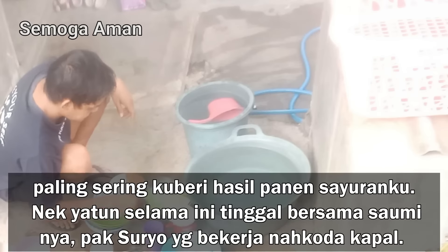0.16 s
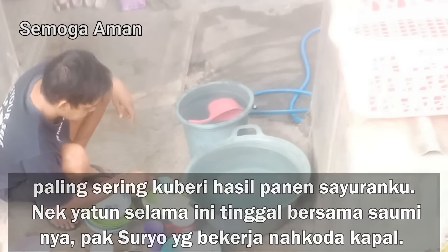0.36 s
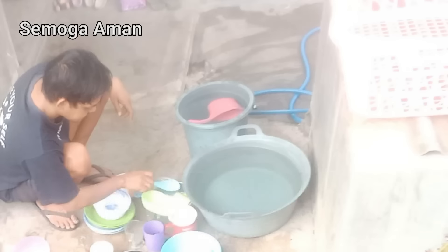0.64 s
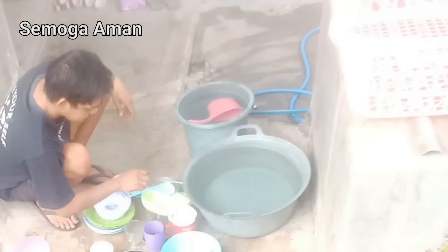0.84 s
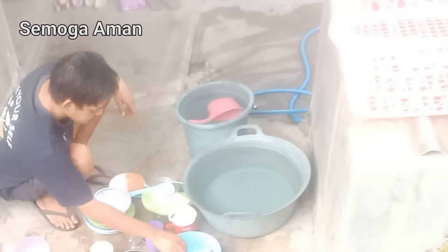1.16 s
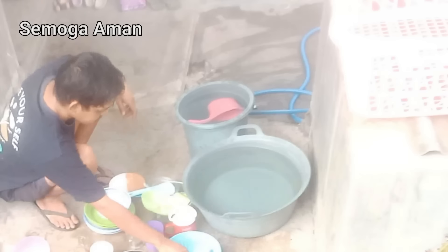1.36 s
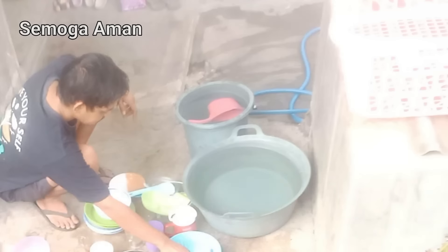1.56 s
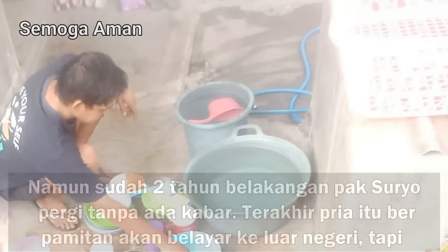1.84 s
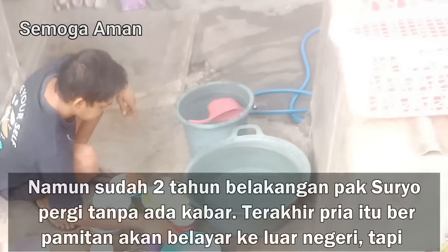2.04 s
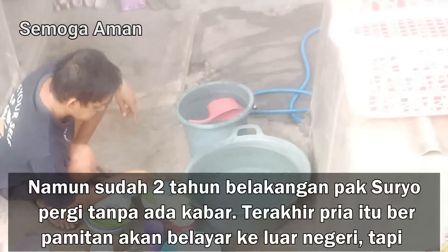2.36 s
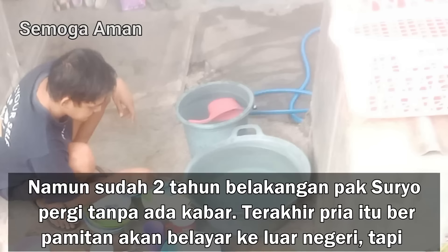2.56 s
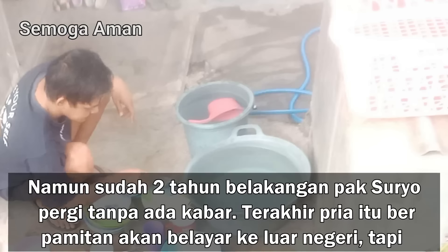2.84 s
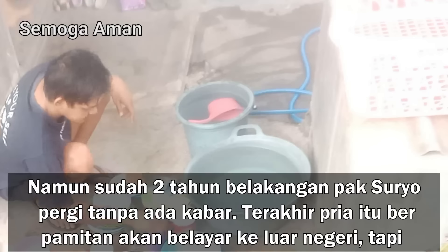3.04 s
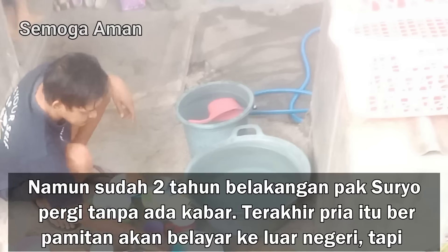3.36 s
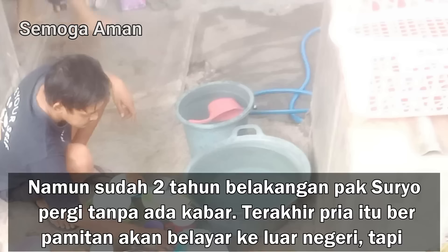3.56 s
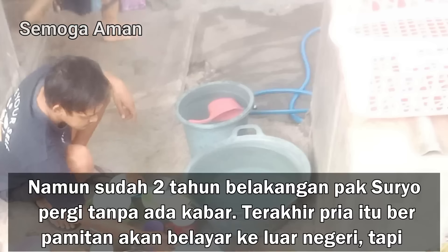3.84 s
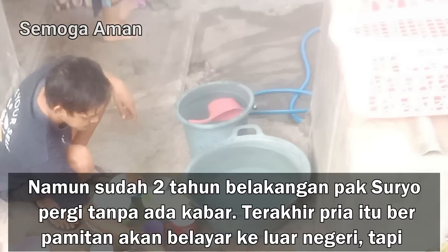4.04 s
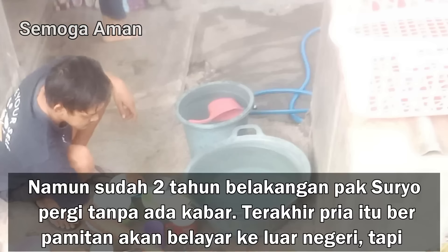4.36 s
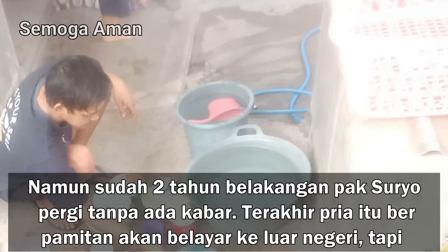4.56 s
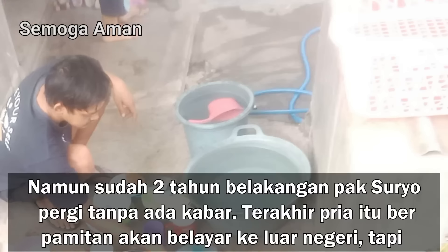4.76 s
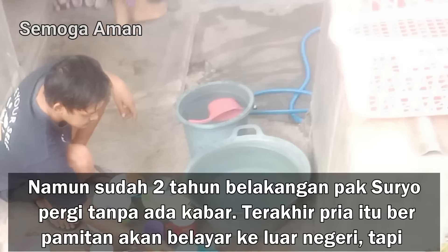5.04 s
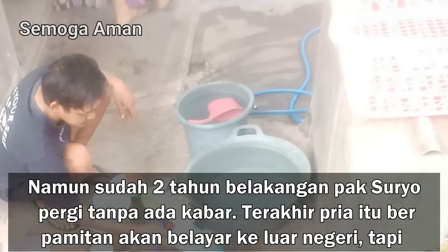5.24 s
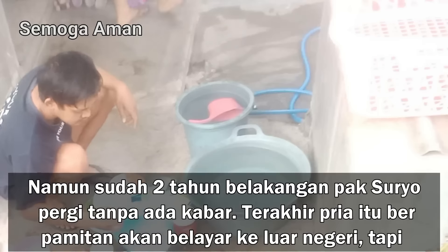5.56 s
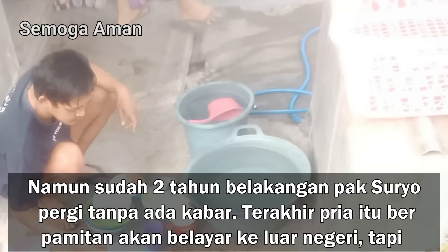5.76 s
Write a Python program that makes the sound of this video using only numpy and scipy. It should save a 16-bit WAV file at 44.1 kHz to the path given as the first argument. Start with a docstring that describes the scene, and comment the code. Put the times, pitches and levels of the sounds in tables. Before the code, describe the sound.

Someone handles wet dishes close by, sparse knocks growing into loud clacks near the end, while chicks peep faintly further off.

```python
"""Dishes handled in a walled yard

Plastic and metal dishes are knocked, set down and slid about on a concrete floor.
Each blow is a noise crack and rattle that ring the struck dish's modes; slid dishes hum as wavering tones.
Wet hands swish as shaped noise, chicks peep further off as rising whistles, and a narrow-band rumble
swells over the air of the yard. Decaying noise tails give the echoes of the walls."""
import sys
import numpy as np
from scipy import signal
from scipy.fft import rfft, irfft
from scipy.io import wavfile
from scipy.ndimage import uniform_filter1d

SR = 44100
rng = np.random.default_rng(int(sys.argv[2]) if len(sys.argv) > 2 else 0)


def put_to_file(sound):
    """Save the sound as 16-bit audio at rate SR, in the file named by the first command-line argument."""
    columns = np.atleast_2d(sound).T  # one column per channel
    safe = np.clip(columns, -1, 1)
    whole_steps = np.round(safe * 32767)
    wavfile.write(sys.argv[1], SR, whole_steps.astype(np.int16))


N = 260631

# low modes of the basin, part of the dish table: hz, width_hz, level_db (relative)
BASIN_WALLS = [(247, 10, -7), (336, 11, -17), (358, 22, -2), (413.4, 42, 4), (502, 5.5, -3.5)]


def undb(db):
    """Amplitude ratio of a level in dB."""
    return 10 ** (np.asarray(db) / 20)


def unit(x):
    """Scale to rms 1."""
    return x / np.sqrt(np.mean(x ** 2))


def on_log(hz, points):
    """Interpolate (hz, value) points over log frequency."""
    points_hz, values = np.transpose(points)
    return np.interp(np.log(hz + 1), np.log(points_hz), values)


def coloured(points, tilt_db_per_octave=0.):
    """Noise with a given spectrum, rms 1."""
    hz = np.fft.rfftfreq(N, 1 / SR)
    gain_db = on_log(hz, points) + tilt_db_per_octave * np.log2((hz + 50) / 6000)
    white = rng.standard_normal(N)
    return unit(irfft(rfft(white) * undb(gain_db), N))


def band(x, hz, width_hz):
    """Two-pole resonance, gain 1 at the centre."""
    b, a = signal.iirpeak(min(hz, .45 * SR), hz / max(width_hz, 3), SR)
    return signal.lfilter(b, a, x)


def smooth_twice(x, size):
    """Moving average, applied twice."""
    return uniform_filter1d(uniform_filter1d(x, size), size)


def walk(rate_hz):
    """Random levels held 1 / rate_hz s and slewed twice, rms 1."""
    hold = int(SR / rate_hz)
    steps = np.repeat(rng.standard_normal(N // hold + 1), hold)
    return unit(smooth_twice(steps, hold)[:N])


def add(out, start_s, x):
    """Mix x into out from start_s, cut at the end of out."""
    i = int(start_s * SR)
    out[i:i + len(x)] += x[:N - i]


def causal(size, gain_db):
    """Minimum-phase spectrum with this gain: the filter answers only after its input."""
    cepstrum = irfft(gain_db * np.log(10) / 20, size)
    cepstrum[1:size // 2] *= 2
    cepstrum[size // 2 + 1:] = 0
    return np.exp(rfft(cepstrum))


def air():
    """Steady coloured noise whose octave bands flicker independently."""
    # air spectrum: hz, density_db_per_hz (relative)
    air_colour = [(15, -57), (25, -38), (97, -1.5), (242, -6), (285, -6), (405, -13), (516, -9.5),
                  (575, -12), (1040, -15.5), (2220, -22), (2610, -23.5), (6210, -29.5), (7920, -26),
                  (10100, -45.5), (16000, -47)]
    level_db, flicker_db, flicker_hz = -59.5, 1.3, 3.39
    hush = coloured(air_colour)
    bands = 0
    for hz in 40 * 2. ** np.arange(9):
        bands = bands + undb(flicker_db * walk(flicker_hz)) * band(hush, hz, 1.4 * hz)
    return undb(level_db) * unit(bands)


def rumble():
    """A narrow low rumble: faint between swells that grow a little and then stop short."""
    # swells: start_s, length_s, level_db (nominal, at the end of the growth)
    swells = [(0.202, 0.41, -51.5), (0.888, .14, -46), (1.487, 0.11, -64), (1.807, 0.066, -51),
              (2.344, 0.15, -53), (2.913, 0.19, -49), (3.095, 0.14, -51), (3.37, 0.23, -59),
              (4.506, .1, -49.5), (5.12, 0.28, -51.5), (5.72, 0.12, -56)]
    centre_hz, width_hz = 72, 30
    edge_s, growth_db, lull_db = 0.051, 3.5, -74
    t = np.arange(N) / SR
    gain = undb(lull_db + 1.7 * walk(5.8))
    for start_s, length_s, level_db in swells:
        edges = np.clip(np.minimum(t - start_s, start_s + length_s - t) / edge_s, 0, 1)
        growth = np.clip((t - start_s) / length_s - 1, -1, 0)
        gain = gain + edges * undb(level_db + growth_db * growth)
    white = rng.standard_normal(N)
    return gain * unit(band(band(white, centre_hz, width_hz), centre_hz, width_hz))


def grazes(count):
    """Faint hums at chance moments and pitches, as hands shift the pile."""
    level_db, spread_db = -67, 1.5
    shortest_s, longest_s = .03, .09
    lowest_hz, highest_hz = 299.8, 3003
    rows = []
    for when, how_long, how_high, how_loud in rng.random((count, 4)):
        start_s = when * (N / SR - .2)
        length_s = shortest_s + (longest_s - shortest_s) * how_long
        hz = lowest_hz * (highest_hz / lowest_hz) ** how_high
        rows.append((start_s, length_s, hz, level_db + spread_db * (2 * how_loud - 1)))
    return rows


def swish():
    """Wet hands wipe over plastic and water slops: a grainy hiss that swells, then dies away."""
    # wipes: start_s, rise_s, fall_s, level_db, tilt_db_per_octave
    wipes = [(.45, 0.23, 0.078, -61, 4.5), (.69, 0.018, 0.2, -50, 0.3), (1.74, 0.09, 0.1, -57, 3),
             (4.2, .01, 0.13, -36, -6), (4.37, 0.01, 0.04, -61, 5.7), (4.92, .012, .06, -58.5, 3),
             (5.855, .025, 0.069, -45.5, 3)]
    # hiss spectrum: hz, density_db_per_hz (relative)
    hiss_colour = [(880, -45.5), (1500, -8.5), (1960, -21.5), (2310, -8), (3210, -17), (4210, -6.5),
                   (4910, -19.5), (7570, -4), (15000, -45)]
    fall_db, grain_db, grain_hz = 16, 2.2, 120  # fall_db is lost over each fall_s
    t, out = np.arange(N) / SR, 0
    for start_s, rise_s, fall_s, level_db, tilt in wipes:
        late = np.clip((t - start_s - rise_s) / fall_s, 0, None)
        shape = np.clip((t - start_s) / rise_s, 0, 1) * undb(level_db - fall_db * late)
        out = out + shape * coloured(hiss_colour, tilt)
    return out * undb(grain_db * walk(grain_hz))


def hums():
    """Friction, or a brief knock, feeds a mode unevenly, so the tone wavers in level and pitch, and sags as the
    slide slows."""
    # one mode of a slid or grazed dish, or a short ping of a struck one: start_s, length_s, first_pitch_hz,
    # level_db (nominal)
    slides = [(.47, 0.043, 536, -58.5), (.52, 0.12, 712, -54.5), (1.3, .05, 4980, -51),
              (1.318, 0.051, 8210, -50.5), (1.378, 0.15, 4550, -55), (1.75, 0.061, 912, -52),
              (1.757, .16, 1245, -42), (1.9, .11, 1176, -50.5), (1.93, 0.074, 900, -57.5),
              (1.93, 0.047, 3196, -61), (2.015, 0.049, 1157, -50.5), (2.106, .085, 1215, -43.5),
              (2.235, .055, 1030, -54), (2.35, 0.1, 632.6, -49.5), (2.385, 0.13, 845, -51),
              (2.53, .1, 601, -61), (2.67, 0.046, 626, -53.5), (2.69, .14, 835, -58),
              (2.72, 0.056, 1260, -56), (2.71, 0.057, 2660, -59.5), (2.74, 0.07, 3240, -57),
              (2.76, 0.053, 2285, -57.5), (2.901, 0.033, 2371, -35), (3.387, .08, 632, -59.5),
              (3.614, .09, 1136, -64), (4.119, .06, 622, -56.5), (5.04, 0.28, 1197, -44),
              (5.349, .07, 1201, -40.5), (5.42, .1, 1165, -50.5), (5.53, 0.064, 588, -56.5),
              (5.74, .07, 510, -58)]
    sag_per_s, waver_share, rough_width_share = 0.28, 0.0119, 0.03  # shares of the pitch
    attack_s, fade_db, stutter_db = .008, 12.5, 1.5
    out, waver = np.zeros(N), walk(40)
    stutter = undb(stutter_db * walk(30))
    for start_s, length_s, hz, level_db in slides + grazes(count=90):
        t = np.arange(int(length_s * SR)) / SR
        wobble = waver[int(start_s * SR):][:len(t)]
        pitch_hz = hz * (1 - sag_per_s * t + waver_share * wobble)
        # drawn long, so that the resonance has built up in the part kept
        rough = unit(band(rng.standard_normal(SR // 3), hz, rough_width_share * hz))[-len(t):]
        tone = np.sin(2 * np.pi * np.cumsum(pitch_hz) / SR) + 0.57 * rough
        edges = np.minimum(np.minimum(t, length_s - t) / attack_s, 1)
        shape = edges * undb(-fade_db * (t / length_s) ** 3)
        add(out, start_s, undb(level_db) * band(shape * tone, hz, hz / 2))
    return out * stutter


def ringing(force, modes, tilt_db_per_octave):
    """Each mode resonates to the blow and takes its own share of the energy."""
    total = 0
    for hz, width_hz, level_db in modes:
        ring = unit(band(band(force, hz, width_hz), hz, hz / 4))
        gain_db = level_db + tilt_db_per_octave * np.log2(hz / 2000)
        total = total + undb(gain_db) * np.sqrt(width_hz) * ring
    return unit(total)


def blows():
    """A bright crack, then the dish chatters against its neighbours until it settles; both shake its modes."""
    # blows: start_s, dish, level_db (over the rms of crack + rattle), rise_ms, crack_db (over the rattle),
    # rattle_t60_s, ring_db (over the body), tilt_db_per_octave
    strikes = [ (0.873, "bowl", -26.5, 1.1, 4.5, 0.21, -3, -0.4),
               (.952, "bowl", -38.5, 1.1, 25.5, 0.13, -22, -4), (1.32, "lid", -40.5, 6, -9, 0.4, -3, -5),
               (1.692, "mug", -46.5, 1.1, 18, 0.11, 1.5, -2), (1.812, "mug", -57, 1.5, -10, 0.12, 7.5, -4),
               (2.903, "cup", -48, 1.1, 3, 0.33, 4, -1), (2.934, "spoon", -46, 4.4, 0.5, 0.28, -9.5, -2.5),
               (2.9852, "spoon", -32, 2.5, 4, .18, -9, 1.5), (3.115, "steel", -56, 8, 5, 0.44, 2.5, -6),
               (3.158, "steel", -29, 29, 9, 0.21, 0.5, -3.5), (3.180, "steel", -32, 1.5, -48.5, 0.28, 6, 3),
               (3.845, "mug", -64.5, 3, -1, 0.17, 1.5, -3), (4.05, "mug", -52.5, 1.5, 11.5, 0.12, 3.5, -6),
               (4.191, "basin", -21, .6, 16.5, .2, -6.5, -0.32),
               (4.381, "spoon", -56.5, 1.5, 16, 0.084, -23, 10.5),
               (4.516, "plate", -24.5, .6, 19, .2, 2, -0.24),
               (4.7918, "saucer", -35, .6, 17, 0.14, -3, -2.5),
               (4.887, "saucer", -43.5, 1.5, 8, 0.19, -28, -2.6),
               (4.917, "spoon", -38, .6, 4.5, 0.081, -21, 1), (5.036, "tray", -23, .6, 14, 0.17, -9, 2),
               (5.2372, "pot", -23.5, .6, 11.5, 0.17, -3.5, -3), ]
    # per dish: modes (hz, width_hz, level_db) and rattle colour (hz, density_db_per_hz), levels relative
    dishes = { "bowl": ([(810, 30, -9), (1200, 63, -2.5), (2020, 690, -20), (2650, 39, -8.5),
              (4200, 140, -27), (5200, 98, -24), (6900, 27, -40), (6270, 110, -23), (10900, 87, -54)],
              [(120, -59), (200, -45), (635, -10), (1060, -12), (1210, -7.5), (1590, -11), (2700, -16),
              (7970, -11.5), (16000, -52)]), "lid": ([(596, 60, -11), (1428, 27, 6), (1760, 12, 10),
              (2480, 70, -27), (3180, 11, 18.5), (4170, 190, 7), (5100, 39, 0), (5340, 30, -23),
              (6460, 120, -23), (7890, 37, -5), (7840, 28, 4), (10300, 30, -31)], [(240, -58), (400, -24),
              (607, -15), (1110, -43), (1420, 2.5), (2470, 12), (7400, -23), (8110, -22), (16000, -59)]),
              "cup": ([(1270, 29, -6), (1690, 43, -6), (2360, 64, -6), (4120, 28, -9), (4490, 56, -3),
              (5580, 39, -23), (6320, 47, -3), (7200, 61, -5), (7600, 45, -10), (9400, 42, -14),
              (10500, 32, -23.5)], [(240, -55), (400, -11.5), (1230, -8.5), (2020, 0.5), (2360, 13),
              (3470, -27), (4050, -15.5), (8110, -7.5), (16000, -70)]), "mug": ([(1550, 30, -1),
              (2322, 200, -3), (2650, 30, -10), (3140, 170, -12), (4300, 66, -4), (6900, 58, -17),
              (8050, 60, -2.5), (10300, 33, -15)], [(350, -33), (600, -43), (1430, -6.5), (2090, -4.5),
              (2370, -12), (2870, -18.5), (8160, -15), (16000, -80)]), "spoon": ([(1524, 39, -6.5),
              (2320, 47, -7), (2850, 12, -2), (3350, 47, -6), (3990, 50, -5), (6150, 26, -26),
              (6530, 100, -5), (7390, 94, -13), (8900, 26, -11), (11900, 31, -11), (13200, 30, -13.5),
              (14100, 28, -23.5)], [(240, -47.5), (400, -23.5), (553, -7.5), (1490, -9.5), (1840, -13.5),
              (3310, -5), (5690, -8.5), (7280, 0), (16000, -48)]), "steel": ([(1231, 72, -16),
              (1600, 32, -16), (2040, 33, -21), (2785, 31, 3), (4060, 74, -5), (3920, 24, -13.5),
              (4585, 140, -4), (4770, 22, -5), (5300, 35, -6.5), (5530, 20, -16.5), (5970, 35, -6.5),
              (6670, 120, -1), (7150, 44, -17), (7410, 18, -13.5), (7816, 40, 3.5), (8630, 97, -23),
              (9170, 60, -4.5), (9810, 38, -9.5), (10700, 30, -10.5), (11180, 44, -41), (11480, 120, -20.5),
              (12800, 54, -17.5), (13300, 31, -50), (14100, 60, -23.5), (14600, 34, -24), (14600, 54, -19)],
              [(240, -50.5), (400, -24), (1200, -18), (1930, -9.5), (2750, -7), (3210, -9.5), (5690, -14.5),
              (6640, -0.5), (16000, -41)]), "basin": (BASIN_WALLS + [(833.0, 13, 0.5), (1325, 27, -6),
              (1880, 34, -9.5), (2190, 18, -2.5), (2920, 30, -23.5), (3430, 44, -7.5), (5100, 42, -24),
              (5470, 81, -11.5)], [(59, -65), (100, -30.5), (308, -18), (433, -4), (648, -15), (854, -10.5),
              (1580, -25), (1950, -11.5), (2520, -21.5), (7940, -33), (16000, -65)]),
              "plate": ([(710, 190, 3), (2030, 236, 5.5), (2872, 43, 3), (3970, 140, -6.5),
              (4160, 100, -22.5), (5150, 86, -29), (5360, 54, -21), (5700, 34, -12), (6360, 93, -2.5),
              (6620, 56, -8), (7600, 55, 0.5), (8030, 110, -7.5), (8170, 66, -14), (8460, 40, -25.5)],
              [(59, -41), (100, -37.5), (244, -1.5), (461, -1), (705, 0.5), (1760, 1), (2080, -12),
              (3620, -8), (7450, -16), (8830, -33), (16000, -55)]), "saucer": ([(252, 34, 1), (419, 12, -6),
              (720, 180, 0.5), (1250, 13, -16), (2050, 620, -7.5), (2720, 84, -27), (3260, 72, -3),
              (4460, 40, -22)], [(59, -60), (100, -39), (239, -6), (328, -2.5), (1250, -5), (1420, -6),
              (2080, -1.5), (8110, -15), (16000, -46)]), "tray": ([(942, 32, 9), (1320, 32, -5),
              (1657, 32, 11), (1723, 39, 9.5), (2250, 32, -13), (2300, 28, -5), (3270, 52, 4),
              (3620, 48, 1), (3930, 46, -4), (4020, 65, -1.5), (4280, 50, -34)], [(59, -69), (100, -34),
              (570, 4), (950, 0), (1480, -5.5), (1870, -6), (2750, -14.5), (3190, -19), (7450, -25),
              (16000, -72)]), "pot": ([(466, 78, -1), (724, 80, 6.5), (1180, 44, -12), (1480, 33, -22),
              (1836, 25, 11.5), (2496, 34, 9.5), (2790, 310, 4.5), (3100, 210, 2), (3780, 51, -26),
              (4350, 37, -24)], [(59, -59), (100, -69), (219, -18), (492, 0.5), (621, 0.5), (752, -2.5),
              (1870, -5), (2080, -10.5), (7940, -17.5), (16000, -56)]), }
    crack_t60_s, chatter_db, lumps_rms_db = 0.0068, 3.13, 2.5  # chatter before smoothing
    out, t = np.zeros(N), np.arange(SR // 2) / SR
    size = len(t)
    hz = np.fft.rfftfreq(size, 1 / SR)
    octaves = np.log2((hz + 50) / 2000)
    for start_s, dish, level_db, rise_ms, crack_db, rattle_t60_s, ring_db, tilt in strikes:
        modes, colour = dishes[dish]
        steps = np.repeat(rng.standard_normal(size // 128 + 1), 128)
        chatter = undb(chatter_db * uniform_filter1d(steps, size=64)[:size])
        touch = np.minimum(t * 1000 / rise_ms, 1) * rng.standard_normal(size)
        crack = touch * undb(crack_db - 60 * t / crack_t60_s)
        rattle = touch * chatter * undb(-60 * (t / rattle_t60_s) ** 1.235)
        ring = ringing(undb(1.5) * crack + rattle, modes, tilt)
        # random smooth lumps in the spectrum vary the colour of each blow
        lumps_db = lumps_rms_db * unit(smooth_twice(rng.standard_normal(len(hz)), 90))
        body_db = on_log(hz, colour) + tilt * octaves + lumps_db
        rattle_spectrum = rfft(rattle) * causal(size, body_db)
        crack_spectrum = rfft(crack) * causal(size, body_db + 1.2 * octaves)  # brighter
        body = irfft(rattle_spectrum + crack_spectrum, size)
        strength = undb(level_db) * np.std(crack + rattle)
        add(out, start_s, strength * (body / np.std(body) + undb(ring_db) * ring))
    return out


def peep(length_s, first_hz, last_hz, shake):
    """A hoarse rising whistle, strongest on the second partial."""
    # levels of partials 1 to 3: level_db
    partials_db = [-22.5, 1.6, -32.5]
    u = np.arange(int(length_s * SR)) / (length_s * SR)
    glide_hz = first_hz + (last_hz - first_hz) * np.sin(np.pi * u / 2)
    pitch_hz = glide_hz * (1 + 0.018 * shake[:len(u)])
    phase = 2 * np.pi * np.cumsum(pitch_hz) / SR
    whistle = sum(undb(db) * np.sin(k * phase) for k, db in enumerate(partials_db, start=1))
    return np.sin(np.pi * u ** 0.98) * whistle


def peeps():
    """Chicks call out in short whistles, their pitch shaken fast enough to sound hoarse."""
    # calls: start_s, length_s, first_pitch_hz, last_pitch_hz, level_db (relative)
    calls = [(1.112, 0.12, 2480, 4004, -54), (1.405, 0.047, 3000, 3230, -57.5),
             (3.372, 0.14, 2494, 3813, -49.5), (3.921, 0.19, 3140, 3430, -83),
             (3.944, 0.23, 1575, 2350, -72), (4.127, 0.065, 3030, 3170, -56), (5.047, 0.1, 2700, 3950, -47)]
    out, shake = np.zeros(N), walk(700)
    for start_s, length_s, first_hz, last_hz, level_db in calls:
        call = peep(length_s, first_hz, last_hz, shake[int(start_s * SR):])
        add(out, start_s, undb(level_db) * call)
    return out


def yard_tail(stretch):
    """Dense echoes of concrete walls; each band dies at its own rate."""
    # decay: hz, t60_s (before stretch)
    decay = [(150, 0.41), (700, 0.25), (2500, 0.3), (7000, 0.27), (14000, 0.062)]
    t = np.arange(SR // 2) / SR
    noise = rng.standard_normal(len(t))
    tail = 0
    for hz in 125 * 2. ** np.arange(8):
        t60_s = stretch * on_log(hz, decay)
        tail = tail + band(noise, hz, 0.76 * hz) * undb(-60 * t / t60_s)
    tail *= np.clip((t - .002) / 0.0067, 0, 1)  # the first wall answers a few ms late
    return tail / np.sqrt(np.sum(tail ** 2))


def scene():
    """Dishes close by and chicks further off, with their echoes, over swish, air and rumble."""
    near_wet_db, far_wet_db, far_dry_db = -6.5, 4.5, -12
    near, far = blows() + hums(), peeps()
    echo = undb(near_wet_db) * signal.fftconvolve(near, yard_tail(stretch=0.79))[:N]
    # the chicks are heard mostly by way of a wider, longer-sounding space
    echo += undb(far_wet_db) * signal.fftconvolve(far, yard_tail(stretch=1.4))[:N]
    return (near + undb(far_dry_db) * far + echo + swish() + air() + rumble())[None]


def record(dry):
    """A steep elliptic low-pass cuts the top."""
    top_hz, ripple_db, stop_db = 15900, .2, 80
    low_pass = signal.ellip(10, ripple_db, stop_db, top_hz, fs=SR, output="sos")
    return signal.sosfilt(low_pass, dry)


dry = scene()
out = record(dry)
put_to_file(out)
```